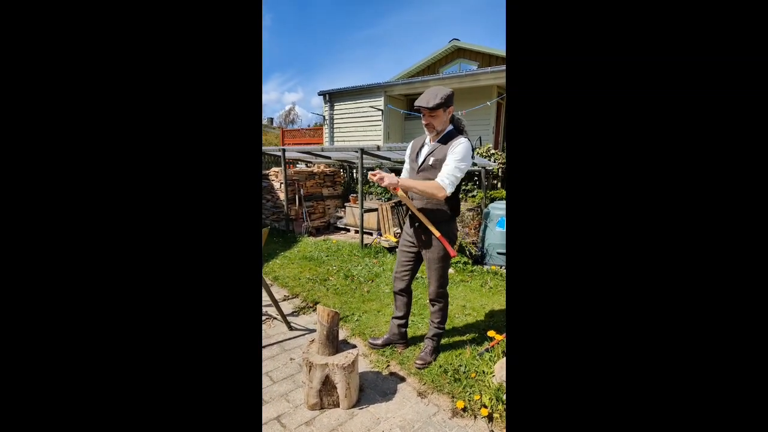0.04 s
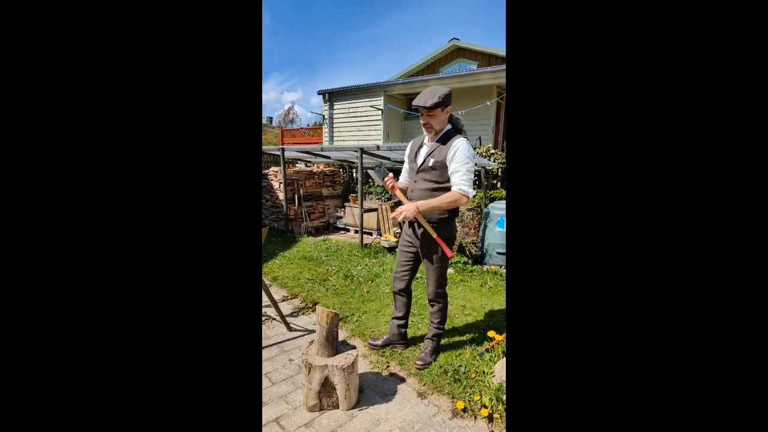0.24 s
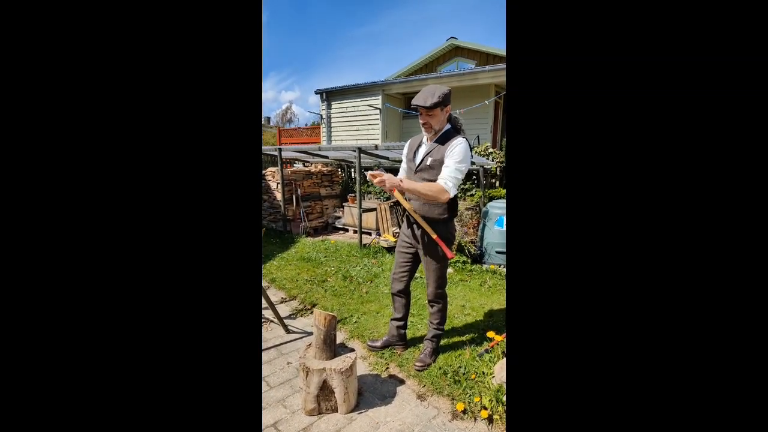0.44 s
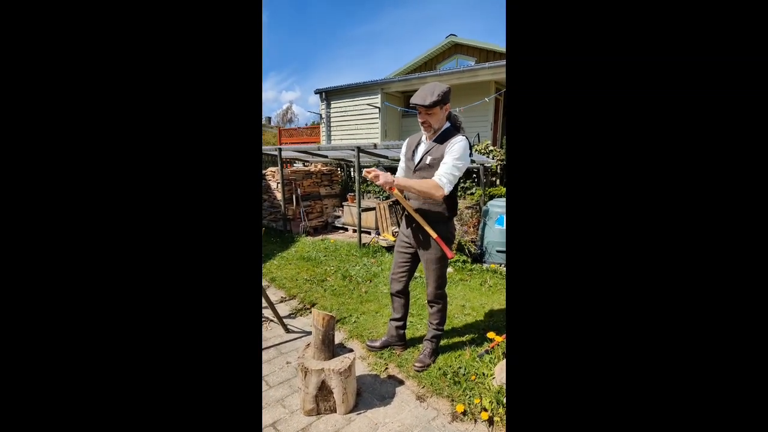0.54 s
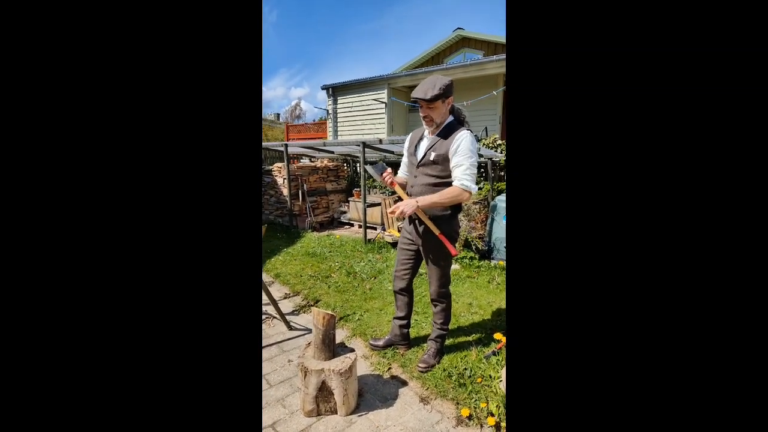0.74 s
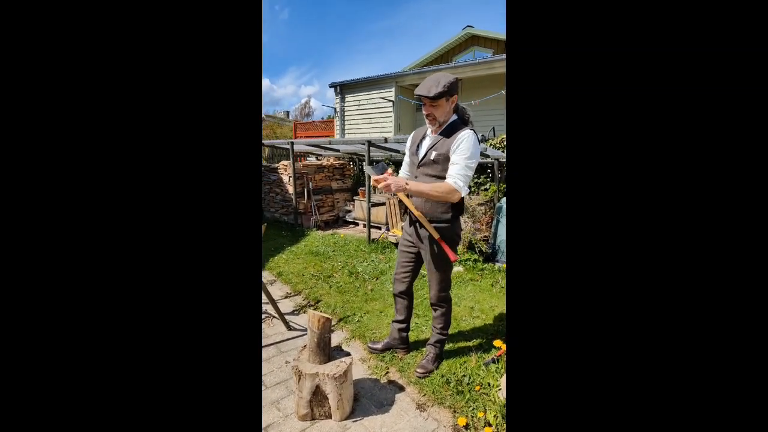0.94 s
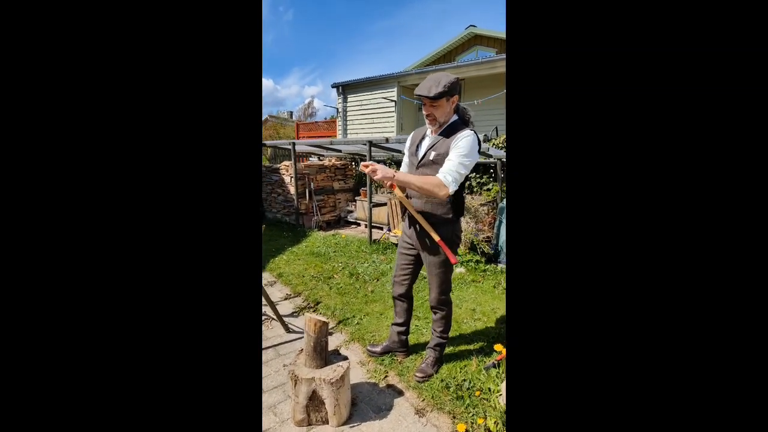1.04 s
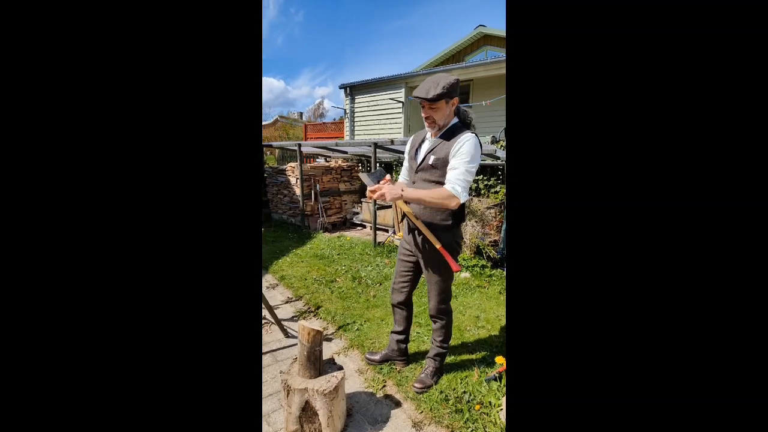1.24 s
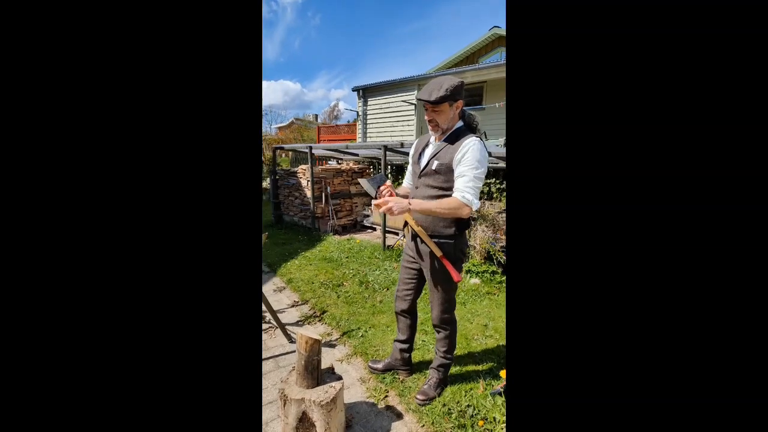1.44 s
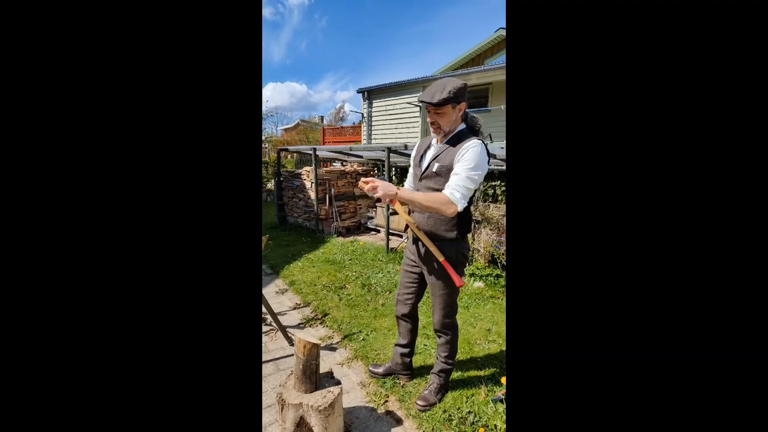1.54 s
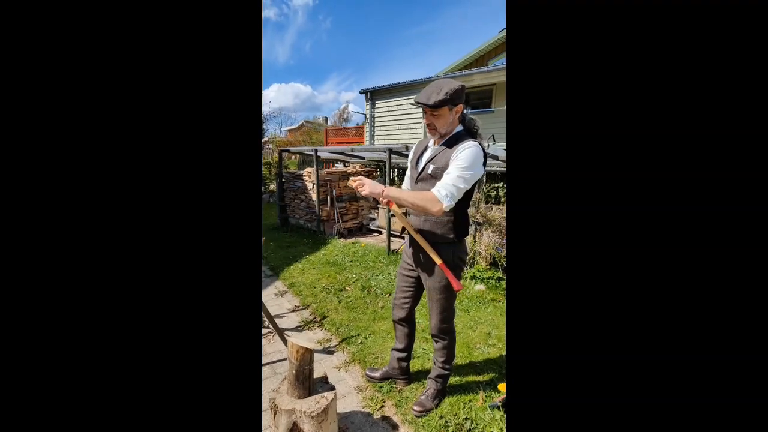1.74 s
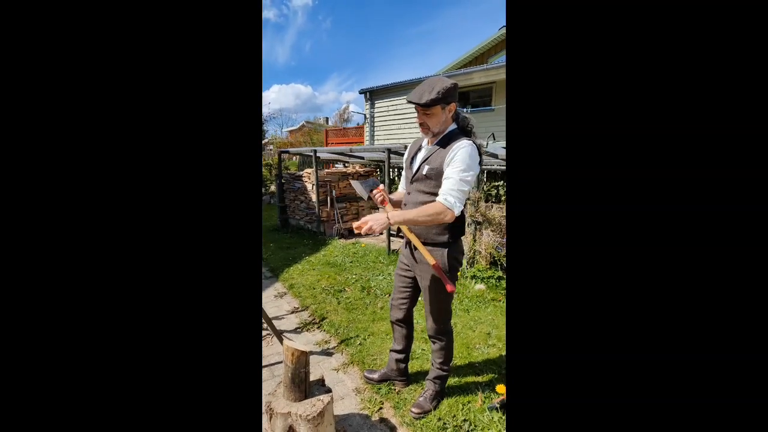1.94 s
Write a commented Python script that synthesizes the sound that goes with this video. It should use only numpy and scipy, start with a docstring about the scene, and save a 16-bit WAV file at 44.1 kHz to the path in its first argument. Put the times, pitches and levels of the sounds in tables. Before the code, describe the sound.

A stone whets a hand-held steel axe in four short strokes. Each starts with a light knock, then rasps along the edge; the first three end in a thin ring. Heard close by in a quiet garden.

```python
"""A stone knocks onto a hand-held steel blade and rasps along its edge: four whetting strokes.
Each impact excites the damped modes of blade and handle. Sliding friction then drives resonances
that shift with the point of contact, and stick-slip adds brief squeaks. After the first three strokes
the stone slips off and the blade rings thinly. Soft garden air and a low rumble lie behind."""
import sys
import numpy as np
from scipy import signal
from scipy.fft import rfft, irfft, next_fast_len
from scipy.io import wavfile
from scipy.ndimage import map_coordinates

SR = 44100
rng = np.random.default_rng(int(sys.argv[2]) if len(sys.argv) > 2 else 0)


def transcribe(u):
    """Save the signal u as a 16-bit wav file named by the first command-line argument.

    u: samples, shape (n,) or (channels, n), limited to [-1, 1]; the rate is SR.
    q: integer samples, one column per channel.
    """
    v = np.clip(np.atleast_2d(u).T, -1, 1)
    q = np.round(v * 32767).astype(np.int16)
    wavfile.write(sys.argv[1], SR, q)


N = 88200
ATTACK_S = 0.0009  # rise time constant of an impact

# broadband spectrum of stone on steel (frequency [Hz], relative level [dB])
GRIT_SPECTRUM = [(100, -36.5), (180, -16.5), (290, -33.5), (800, -28.5), (3400, -27), (6000, -28),
                 (9000, -28), (14000, -28)]


def rasps():
    """Sliding friction: grains of the stone catch on the edge, and their noise drives its resonances."""
    # pressure of the stone, heard as level; one list a stroke (time [s], level [dB])
    strokes = [
        [(.228, -58), (.243, -38), (.253, -39), (.275, -32.5), (.303, -38), (.325, -30.5), (.352, -35.5),
         (.371, -41)],
        [(.795, -56), (.803, -47.5), (.823, -38), (.859, -34.5), (.875, -38.5), (.92, -35), (.945, -39),
         (.962, -34), (.971, -44)],
        [(1.33, -56.5), (1.36, -69.5), (1.377, -55), (1.385, -68), (1.392, -44), (1.403, -62.5), (1.455, -41.5),
         (1.465, -31.5), (1.505, -28.5), (1.524, -37)],
        [(1.92, -68), (1.94, -44.5), (1.974, -37), (2.0, -37)],
    ]
    # path of each stroke; the last two stay at the tip
    # (heel time [s], middle time [s], tip time [s], tilt [dB/octave])
    travel = [(.262, 0.317, 0.36, 1.5), (.86, 0.932, 0.94, 1), (1.25, 1.28, 1.1, 1.5),
              (1.85, 1.88, 1.65, 1)]
    grain_db, grains_per_s, judder_db, judders_per_s = 2.5, 2200, 1.5, 160
    graze_db, graze_range_db = -39, 10  # grazing starts at this level and is complete this far below
    release_s = 0.0026
    out, t = np.zeros(N), np.arange(N) / SR
    for pressure, (heel, middle, tip, tilt_db) in zip(strokes, travel):
        start, end = pressure[0][0], pressure[-1][0]
        grains = rng.standard_normal(N)
        grains *= amp(grain_db * wobble(grains_per_s) + judder_db * wobble(judders_per_s))
        hz, times, spectra = signal.stft(unit(grains), SR, nperseg=1024, noverlap=768)
        near = (times > start - .04) & (times < end + .04)
        hz, times = hz[:, None], times[near]
        level_db = np.interp(times, *np.transpose(pressure))
        graze = np.clip((graze_db - level_db) / graze_range_db, 0, 1)
        place = np.interp(times, [heel, middle, tip], np.arange(3))
        colour = edge_response(hz, times, place, graze) * amp(tilt_db * np.log2(hz + 100))
        spectra[:, near] *= colour / np.sqrt(np.mean(colour ** 2, axis=0))
        rasp = signal.istft(spectra, SR, nperseg=1024, noverlap=768)[1][:N]
        contact = np.exp(-(np.maximum(start - t, 0) + since(end)) / release_s)
        out += rasp * contact * amp(curve(pressure))
    return out


def edge_response(hz, times, place, graze):
    """Resonance depends on the driving point: peaks sink and give way from heel (place 0) to tip (2)."""
    # resonances at three places and under grazing contact (frequency [Hz], width [Hz], level [dB])
    heel = [(1010, 360, -7.5), (1896, 200, -4), (2880, 120, 2.5), (3933, 150, 1), (4800, 200, -10.5),
            (5170, 300, -5.5), (7050, 300, -10), (7600, 400, -12.5), (8200, 310, -12), (9600, 350, -17),
            (10890, 350, -7), (12620, 200, -14.5), (13350, 480, -14)]
    middle = [(1113, 440, -21), (1970, 640, -1.5), (2650, 1300, -5), (4075, 130, 11), (4700, 250, -1),
              (5330, 250, -5.5), (6770, 700, -2.5), (10200, 820, -3), (10850, 210, -3.5), (12800, 290, -1),
              (13280, 290, -8.5)]
    tip = [(409, 27, -4), (594.5, 63, -9.5), (868, 148, -1), (1330, 73, -1.5), (1720, 91, 0.5),
           (2040, 170, -8), (2727, 290, -5), (3906, 44, 0.5), (4270, 310, -8), (4990, 150, -7),
           (5410, 125, -6.5), (6880, 140, -7), (7640, 380, -14), (8530, 230, -14.5), (9990, 160, -9.5),
           (10940, 104, -9), (12500, 370, -14.5), (13700, 264, -15)]
    grazing = [(900, 120, -4), (1680, 200, -2.5), (2760, 180, -4), (3900, 150, -11), (4670, 110, 2),
               (5080, 160, -4.5), (7930, 360, -7), (11400, 370, -13.5), (13070, 700, -15)]
    glide, skirt = 0.011, 1.63  # fractional fall of pitch per place; steepness of a peak
    wander, wanders_per_s = .007, 45  # the peaks waver as the stone rocks

    def resonances(peaks, pitch_ratio):
        power = 0
        for centre, width, db in peaks:
            waver = map_coordinates(rng.standard_normal(256), [times * wanders_per_s], mode="wrap")
            offset_hz = hz - centre * (pitch_ratio + wander * waver)
            power = power + amp(db) ** 2 / (1 + (2 * offset_hz / width) ** 2) ** skirt
        return power
    pressed = sum(np.maximum(1 - abs(place - k), 0) * resonances(peaks, 1 + glide * (k - place))
                  for k, peaks in enumerate([heel, middle, tip]))
    grit = amp(along(GRIT_SPECTRUM, hz)) ** 2
    return np.sqrt(grit + (1 - graze) * pressed + graze * resonances(grazing, 1))


def knocks():
    """Impact excitation: the stone lands and chatters; harder contact favours steel over handle modes."""
    # landings of the stone (time [s], level [dB], hardness [0-1], chatter length [s])
    landings = [(0.2103, -20, 0.99, 0.0071), (.7606, -18, 0.52, 0.004), (1.3006, -20.5, 0, .002),
                (1.8900, -20.5, 0, 0.0014)]
    # blade and handle under the stone (frequency [Hz], soft blow [dB], hard blow [dB], T60 [s])
    held_modes = [(176.7, -21, -32, 0.23), (425, -15, -27.5, 0.063), (592, -8, -24.5, 0.054),
                  (745, -6.5, -17, .035), (861, -3, -13.5, 0.04), (1092, -19, -14, .04),
                  (1411, -9.5, -11, 0.041), (1669, -4.5, 7, 0.028), (1713, -28.5, 9, 0.055),
                  (2130, -7, -18, 0.022), (2624, -8, 9.5, .03), (2940, -13, -2, 0.015),
                  (3952, -24.5, 5.5, .048), (4357, -13, -15, 0.044), (4994, -16, -4, 0.073),
                  (5540, -28.5, -14.5, 0.092), (7030, -27.5, -5, 0.038), (7472, -21, -21, 0.061),
                  (10680, -24, -20.5, 0.055), (13400, -24, -21.5, 0.0527)]
    # noise burst of the contact (frequency [Hz], relative level [dB])
    crack_spectrum = [(150, -13), (300, -16.5), (800, -2), (2700, 0), (3450, -6), (4600, -4.5), (6200, -18),
                      (7700, -7.5), (9300, -17), (11000, -14.5), (14000, -20)]
    rattle_rad, rattles_per_s = 0.45, 260
    settle_s, mute_db_per_s = 0.014, 550  # after a hard blow the stone settles and damps the steel
    knots = np.arange(128) / rattles_per_s
    out = np.zeros(N)
    for onset, db, hardness, chatter in landings:
        t = since(onset)
        ring = np.zeros(N)
        for hz, soft_db, hard_db, t60 in held_modes:
            gain = amp(soft_db + hardness * (hard_db - soft_db)) * rng.choice([-1, 1])
            rattle = rattle_rad * np.interp(t, knots, rng.standard_normal(len(knots)))
            ring += gain * np.cos(2 * np.pi * hz * t + rattle) * fade(t, ATTACK_S, chatter, t60)
        # a harder blow cracks louder and thinner
        spectrum = [(hz, level + hardness * 4.5 * min(np.log2(hz / 2000), 0))
                    for hz, level in crack_spectrum]
        crack = amp(-11 + hardness * 14) * noise(spectrum) * fade(t, ATTACK_S, hold=0, t60=0.056)
        out += amp(db - hardness * mute_db_per_s * since(onset + settle_s)) * (ring + crack)
    # a low cut keeps the knocks light and free of boom
    low_cut = signal.butter(2, 120, "high", fs=SR, output="sos")
    return signal.sosfilt(low_cut, out)


def squeaks():
    """Stick-slip oscillation: one resonance swells, glides with the moving stone and dies."""
    # the stone catches (peak time [s], Gaussian half-width [s], frequency [Hz], glide [Hz/s], level [dB])
    catches = [(.258, 0.0073, 2790, 4, -29), (0.254, 0.0049, 4100, 6001.5, -29),
               (0.273, 0.015, 1936, 2500, -41), (.295, 0.014, 4680, -5000, -38),
               (.315, 0.0072, 10330, 3000, -47), (.334, 0.018, 7260, 11997, -36.5),
               (0.347, 0.0092, 3960, -9000, -29.5), (0.358, 0.0057, 13400, 0, -33.5),
               (.361, .008, 1330, 2, -42), (.845, 0.017, 5280, -3000, -41.5),
               (.846, 0.022, 2895, -1500, -40), (0.857, 0.0048, 3940, 0, -32.5),
               (.892, 0.016, 7500, -30000, -43.5), (0.913, 0.0095, 4555, -3000, -40),
               (.92, 0.015, 10230, 0, -38.5), (.928, 0.025, 4168, -1000, -40),
               (0.952, 0.0093, 9960, -12000, -38), (.958, 0.0094, 1370, 0, -40),
               (1.501, 0.0077, 3870, -3.5, -29.5), (1.513, 0.0034, 1743, -2, -29),
               (1.516, 0.003, 6880, -4000, -29), (1.521, 0.0033, 9900, 6, -29), (1.986, 0.01, 2670, 3, -41)]
    out = np.zeros(N)
    for peak, half_width, hz, glide, db in catches:
        t = np.arange(N) / SR - peak
        phase = 2 * np.pi * (hz * t + glide * t ** 2 / 2) + wobble(per_s=220)
        out += amp(db) * np.exp(-(t / half_width) ** 2 / 2) * np.sin(phase)
    return out


def blade_ring():
    """Free vibration: released by the stone, each mode of the blade decays at its own rate."""
    # modes of the free blade (frequency [Hz])
    free_hz = [176, 880, 1700, 2605, 3858, 4155, 6856, 10628]
    # the same modes (level after a slide [dB], level after a flick off the tip [dB], T60 [s])
    free_modes = [(-20.5, -26, 0.27), (-5, -7, 0.056), (-9, -9, .08), (-6, -18.5, 0.072),
                  (-0.5, 4.5, 0.054), (1, -5.5, 0.12), (-7, 6.5, 0.19), (-19, -8.5, 0.25)]
    # the stone slips off (time [s], level [dB], flick [0-1])
    lifts = [(0.365, -33.5, 0.06), (.965, -34, 0), (1.5182, -33, 1)]
    out = np.zeros(N)
    for onset, db, flick in lifts:
        t = since(onset)
        for hz, (slide_db, flick_db, t60) in zip(free_hz, free_modes):
            gain = amp(db + slide_db + flick * (flick_db - slide_db))
            mode = np.sin(2 * np.pi * (hz * t + rng.random()))
            out += gain * mode * fade(t, attack=0.00067, hold=0, t60=t60)
    return out


def ticks():
    """Brief contacts have broad spectra: stone and fingers touch the tool with light clicks."""
    # touches (time [s], level [dB])
    touches = [(0.2061, -45), (.420, -43), (.527, -51), (0.548, -64.5), (0.7577, -42), (1.021, -52.5),
               (1.2973, -50.5), (1.313, -34), (1.731, -63)]
    return sum(amp(db) * noise(GRIT_SPECTRUM) * fade(since(onset), ATTACK_S, hold=0, t60=0.012)
               for onset, db in touches)


def yard_reverb(steel):
    """Diffuse reflection: the yard answers with a short, exponentially decaying tail."""
    tail = rng.standard_normal(N) * fade(since(0), attack=0.0051, hold=0, t60=0.2)
    return signal.fftconvolve(steel, tail / np.linalg.norm(tail))[:N]


def garden():
    """Ambient noise: soft outdoor hiss and the low turbulent rumble of a light breeze."""
    # spectra of air and breeze (frequency [Hz], relative level [dB])
    air_spectrum = [(120, -36), (200, -6.5), (393, -14), (495, -6), (786, -14), (906, -12), (1200, -17),
                    (1750, -14.5), (1980, -18), (2370, -16), (14000, -28.5)]
    rumble_spectrum = [(20, -1), (50, -0.5), (100, -6.5), (200, -16.5), (400, -16), (1000, -68)]
    # their envelopes (time [s], level [dB])
    air_level = [(0, -70), (.2, -68.5), (.55, -65), (.75, -64), (1.25, -68), (1.6, -68.5), (1.78, -77.5),
                 (2, -59.5)]
    rumble_level = [(0, -67), (.95, -69.5), (1.02, -61.5), (1.1, -68.5), (1.58, -68.5), (1.61, -55),
                    (1.67, -61), (1.72, -64), (1.93, -69), (1.98, -60)]
    air = noise(air_spectrum) * amp(curve(air_level) + 0.37 * wobble(per_s=4.7))
    return air + noise(rumble_spectrum) * amp(curve(rumble_level))


def amp(db):
    """Decibels to amplitude ratio."""
    return 10 ** (np.asarray(db) / 20)


def unit(x):
    """Normalisation to rms 1."""
    return x / np.sqrt(np.mean(x ** 2) + 1e-20)


def along(points, hz):
    """Interpolation of (frequency [Hz], level [dB]) points on a logarithmic frequency axis."""
    point_hz, levels = np.transpose(points)
    return np.interp(np.log(hz + 1), np.log(point_hz + 1), levels)


def curve(points):
    """Linear interpolation of (time [s], level [dB]) points at every sample."""
    return np.interp(np.arange(N) / SR, *np.transpose(points))


def wobble(per_s):
    """Smooth random modulation: a spline through per_s Gaussian values a second."""
    return map_coordinates(rng.standard_normal(N), [np.arange(N) * per_s / SR], mode="wrap")


def filtered(x, response):
    """Zero-phase filtering: the spectrum of x times a frequency response."""
    size = next_fast_len(N + SR // 2)
    return irfft(rfft(x, size) * response(np.fft.rfftfreq(size, 1 / SR)), size)[:N]


def noise(spectrum):
    """White noise filtered to a spectrum, at rms 1."""
    return unit(filtered(rng.standard_normal(N), lambda hz: amp(along(spectrum, hz))))


def since(onset):
    """Seconds since the onset, zero before it."""
    return np.maximum(np.arange(N) / SR - onset, 0)


def fade(t, attack, hold, t60):
    """Exponential damping: a rise, a hold, then a fall of 60 dB every t60 seconds."""
    return (1 - np.exp(-t / attack)) * np.exp(-np.log(1000) * np.maximum(t - hold, 0) / t60)


def scene():
    """Superposition of the whetting, its faint reflections and the garden, in mono."""
    steel = knocks() + rasps() + squeaks() + blade_ring() + ticks()
    return (steel + amp(-23) * yard_reverb(steel) + garden())[None]


def record(dry):
    """Soft saturation rounds the highest peaks; a steep low-pass limits the bandwidth."""
    ceiling, top_hz = .8, 14300
    rounded = dry[0] / (1 + (dry[0] / ceiling) ** 12) ** (1 / 12)
    return filtered(rounded, lambda hz: 1 / np.sqrt(1 + (hz / top_hz) ** 260))[None]


dry = scene()
out = record(dry)
transcribe(out)
```